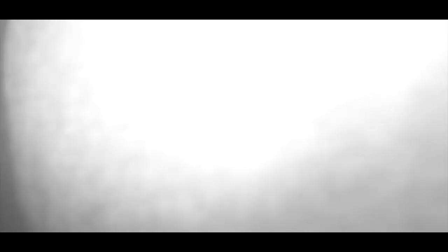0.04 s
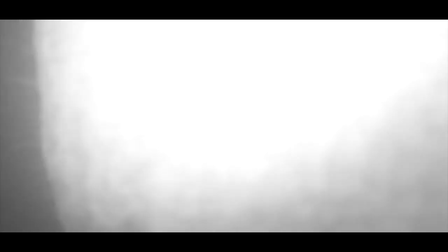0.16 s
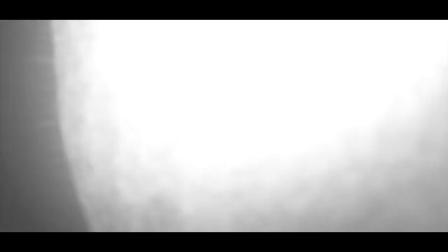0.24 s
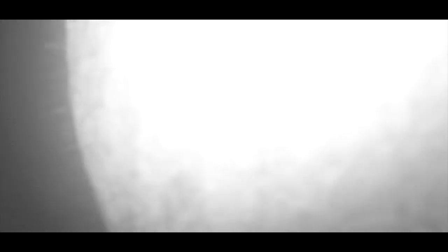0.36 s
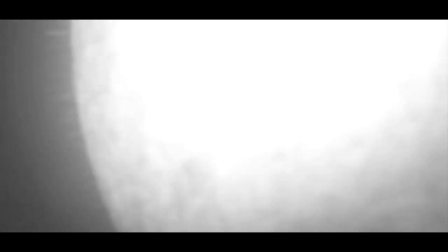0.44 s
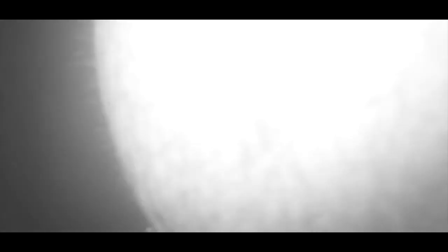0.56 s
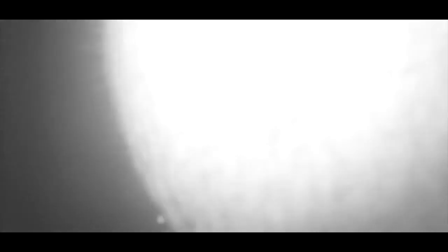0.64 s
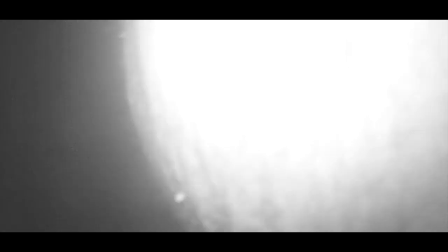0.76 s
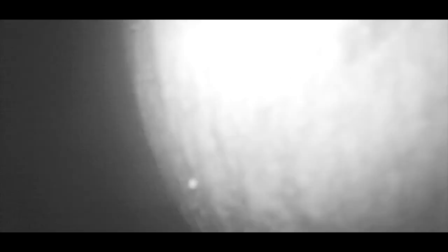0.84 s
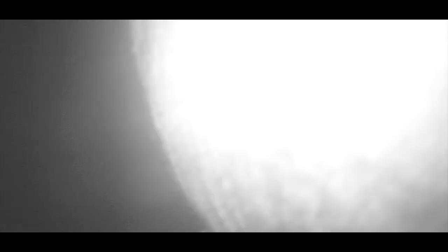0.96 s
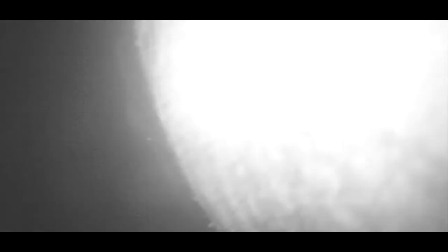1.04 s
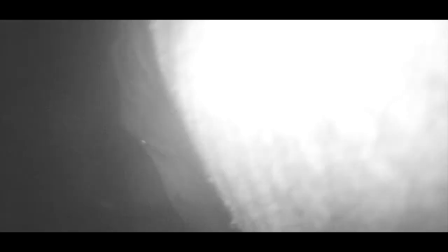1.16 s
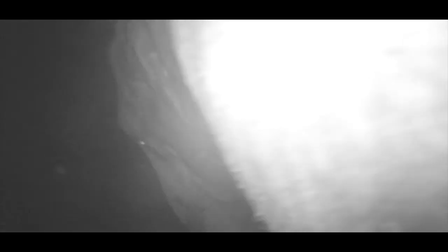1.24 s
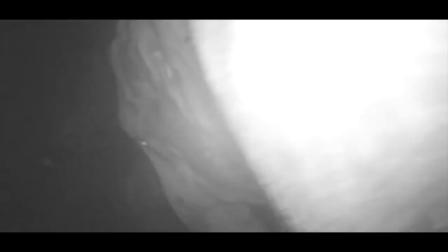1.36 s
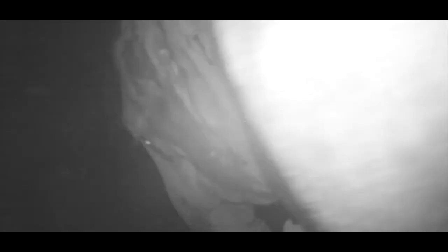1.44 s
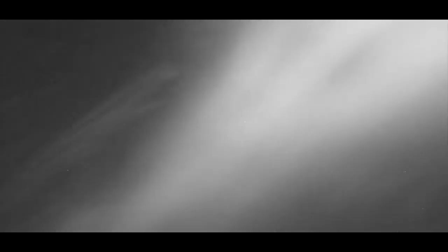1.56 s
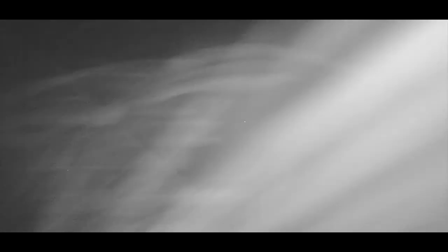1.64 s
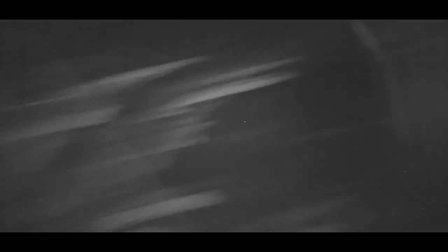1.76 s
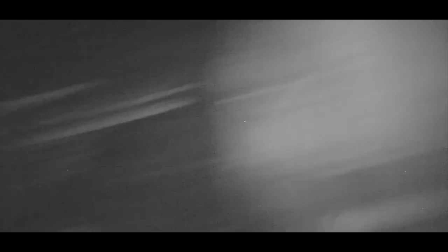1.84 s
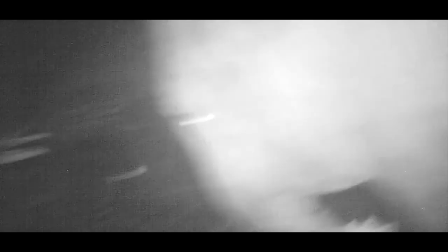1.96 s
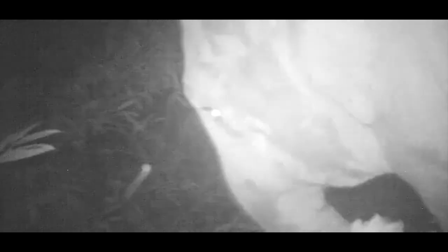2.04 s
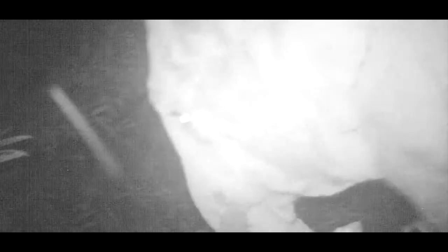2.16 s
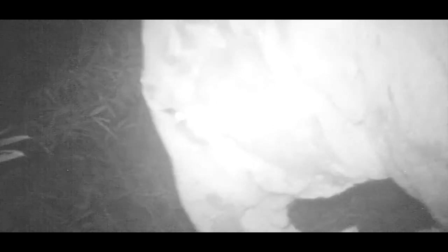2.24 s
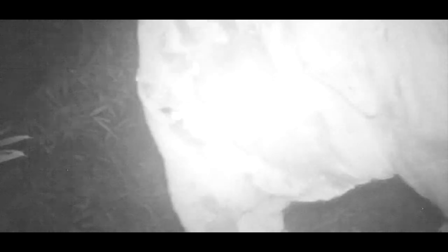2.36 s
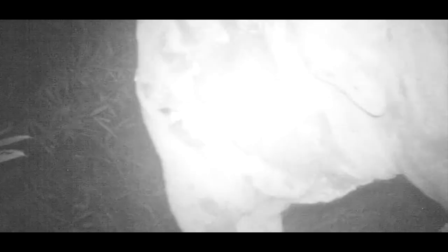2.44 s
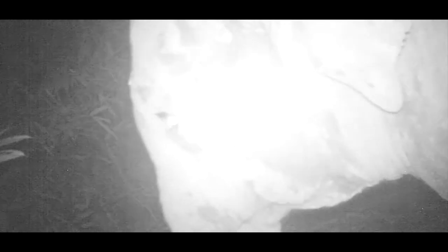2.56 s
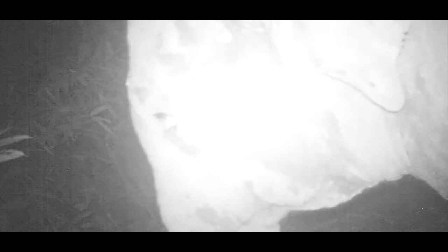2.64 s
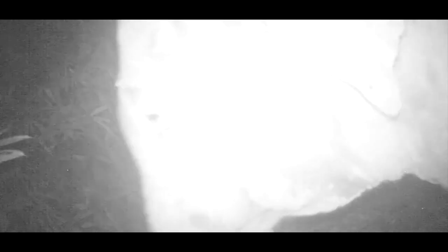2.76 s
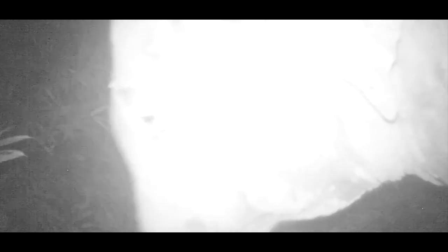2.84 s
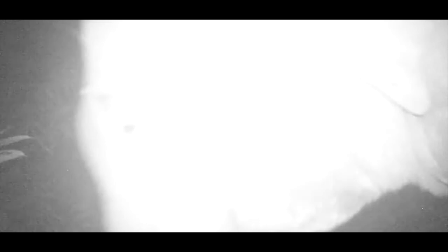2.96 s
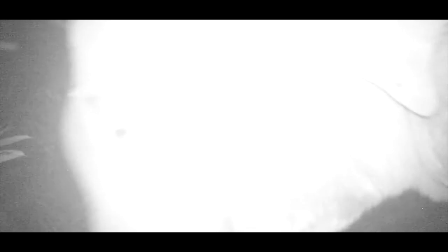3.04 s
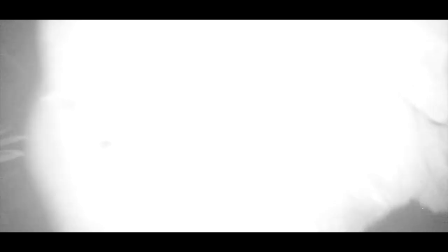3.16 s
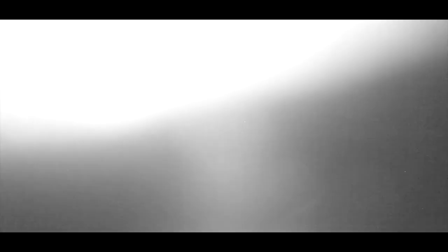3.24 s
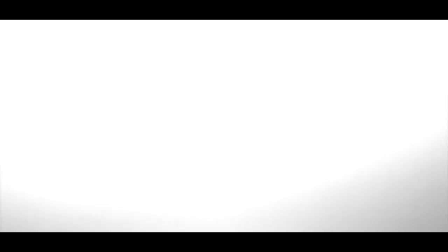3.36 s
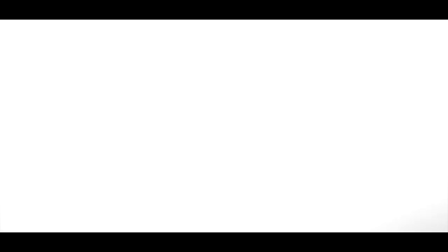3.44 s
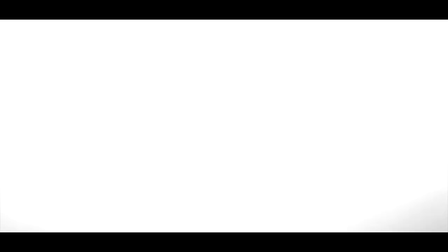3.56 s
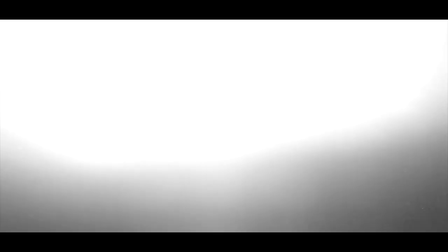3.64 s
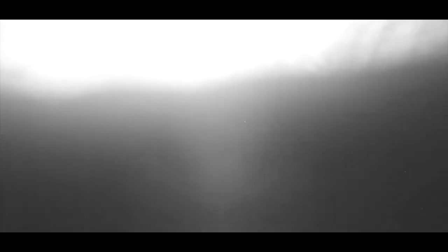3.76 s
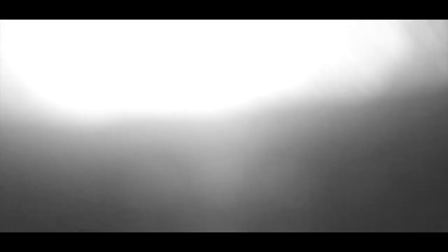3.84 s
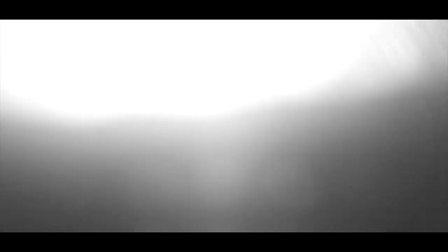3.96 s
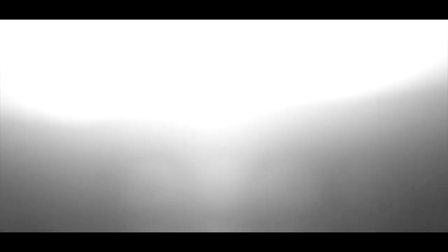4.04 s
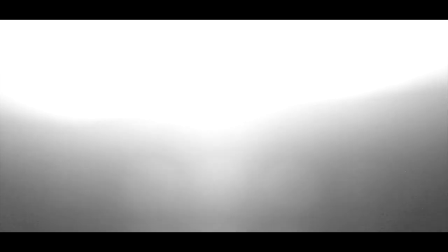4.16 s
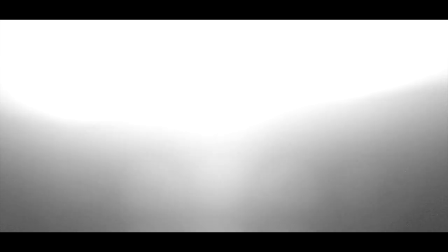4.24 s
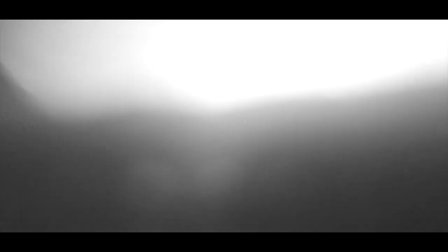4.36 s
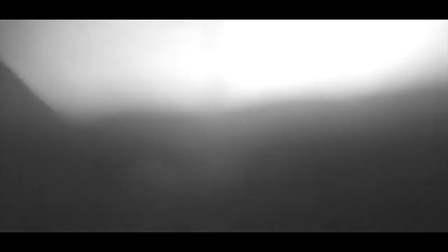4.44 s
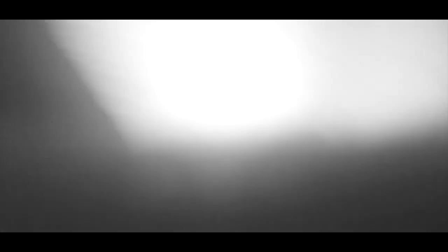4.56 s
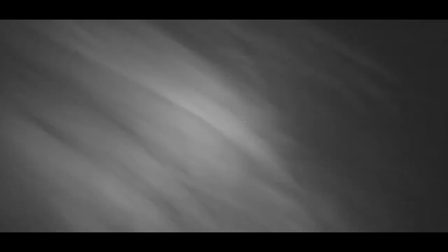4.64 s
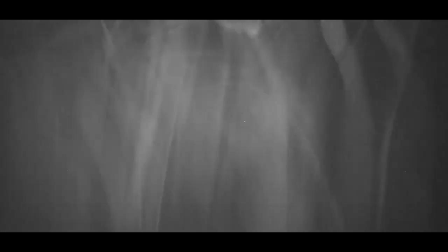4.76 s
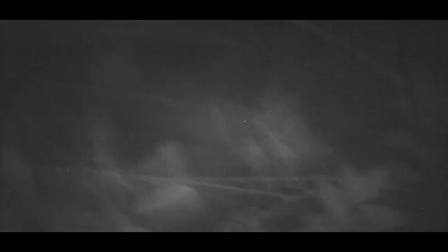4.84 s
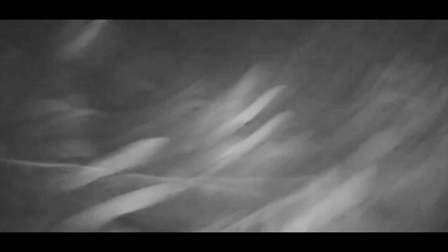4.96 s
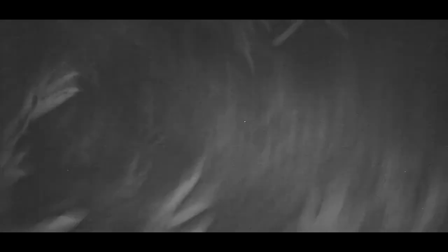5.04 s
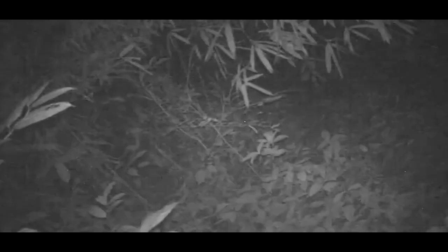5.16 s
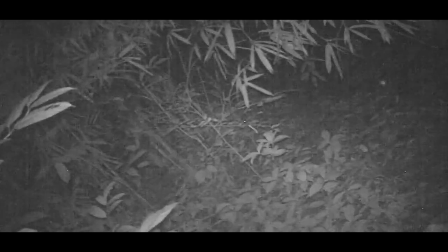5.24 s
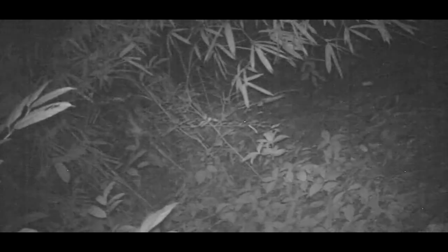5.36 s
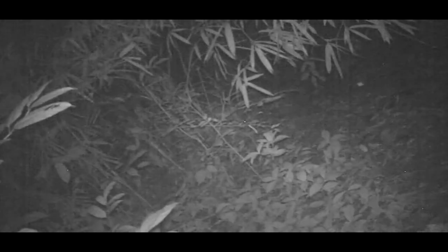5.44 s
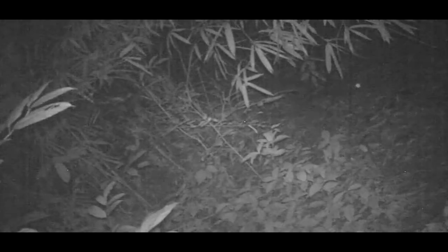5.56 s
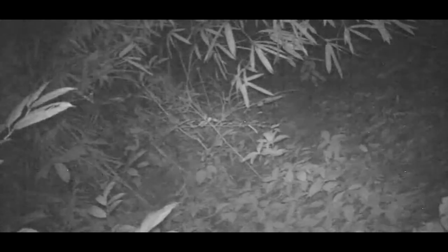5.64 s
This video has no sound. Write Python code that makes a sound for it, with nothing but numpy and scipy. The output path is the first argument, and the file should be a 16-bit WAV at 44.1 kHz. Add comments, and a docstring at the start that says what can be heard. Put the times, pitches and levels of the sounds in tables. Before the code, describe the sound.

An elephant rubs and knocks against a small plastic camera, with close scrapes and loud hollow thumps over night crickets and soft leaf rustle.

```python
"""Elephant against a camera

In a night forest, an elephant's skin drags over a small plastic camera, knocks its hollow case and
shoves it on its squeaking strap. Crickets chirp and leaves hiss behind. The cheap recorder overloads,
keeps little above 5 kHz, and its level is turned down for about a second in the middle."""
import sys
import numpy as np
from scipy import signal
from scipy.fft import rfft, irfft, next_fast_len
from scipy.io import wavfile
from scipy.ndimage import uniform_filter1d, map_coordinates

SR = 44100
rng = np.random.default_rng(int(sys.argv[2]) if len(sys.argv) > 2 else 0)


def wrap_up_sound(samples):
    """Save the sound to the file named by the first command line argument, as 16-bit audio."""
    columns = np.atleast_2d(samples).T
    # keep every value between -1 and 1, then stretch to whole-number steps
    tamed = np.clip(columns, -1, 1)
    steps = np.round(tamed * 32767).astype(np.int16)
    wavfile.write(sys.argv[1], SR, steps)


N = 251370

# Stereo image of the noises. Each row: frequency in Hz, left-right likeness (1 is mono).
STEREO_LIKENESS = [(150, 1), (350, .996), (700, .988), (1300, .96), (2300, .8), (4500, .7)]
# Skin stroking the case. Each row: start and release in seconds, then hiss, rasp and drag in dB.
SKIN_STROKES = [(0, 0.05, -22, -32.5, -40), (0.121, 0.195, -30.5, -53.5, -43),
                (0.269, 0.343, -32, -37, -33.5), (.37, 0.481, -22, -31, -31.5),
                (0.496, 0.629, -23, -20.5, -27), (0.652, .71, -25.5, -26.5, -37.5),
                (.735, 0.791, -26.5, -27, -36.5), (0.814, 0.971, -37, -43, -41.5),
                (1.69, 1.724, -29.5, -32.5, -33.5), (1.99, 2.12, -37.5, -45.5, -51),
                (2.14, 2.273, -39, -41, -44), (3.31, 3.415, -42, -43, -36), (4.497, 4.71, -41, -44, -47),
                (4.72, 4.778, -24, -34, -32), (4.784, 4.834, -17, -28, -26.5),
                (4.87, 4.964, -37.5, -45.5, -47), (4.985, 5.036, -36.5, -34, -32),
                (5.29, 5.362, -46, -52, -69)]
# Tone colours of the noise layers. Each row: frequency in Hz, relative level in dB.
WRINKLE_HISS_EQ = [(1500, -41.5), (2300, -10), (2900, -5), (3500, 1.5), (4200, -6), (4800, -9), (6000, -36)]
BRISTLE_RASP_EQ = [(700, -32.5), (1200, -8), (1600, -4), (2300, -2.5), (2900, -5.5), (4000, -39)]
FOLD_DRAG_EQ = [(70, -32), (130, -3), (450, -6.5), (1000, -2.5), (1500, -16), (2500, -42.5)]
SWAY_EQ = [(8, -16.5), (18, 1.5), (35, -2), (70, -7), (140, -15.5), (300, -40)]
LEAF_EQ = [(47, -36.5), (80, -6.5), (353, -14), (434, -12.5), (967, -12.5), (1850, -11.5), (2430, -5.5),
           (2650, -7.5), (3360, -1), (4730, -8.5), (6150, -40), (10400, -120)]
KNOCK_CRACKLE_EQ = [(760, -32.5), (1300, -10.5), (1680, -6), (2230, -3.5), (2820, -3), (4090, -2),
                    (4730, -15), (6150, -39), (10400, -120)]
KNOCK_BODY_EQ = [(90, -23.5), (150, 1.5), (440, -1.5), (800, -2.5), (1400, -4.5), (2200, -13.5),
                 (3500, -40)]
BRUSH_EQ = [(2200, -39.5), (2800, -7.5), (3300, 0), (3900, -3.5), (4600, -11.5), (5500, -40)]
# Fader moves for the camera's sway and for the leaves. Each row: time in seconds, level in dB.
SWAY_FADER = [(0, -38.5), (.3, -31), (.46, -42), (.6, -31.5), (.92, -35), (1.05, -57), (1.37, -54),
              (1.42, -32), (1.58, -40.5), (1.74, -26), (1.9, -38.5), (2.25, -41.5), (2.4, -57.5),
              (2.75, -56.5), (2.8, -45.5), (3.25, -51.5), (3.38, -25), (3.66, -55.5), (4.42, -58.5),
              (4.5, -36), (4.8, -28.5), (5.2, -33), (5.33, -57), (5.7, -61)]
LEAF_FADER = [(.1, -40.5), (.97, -37.5), (1.1, -41), (1.4, -43), (1.85, -41.5), (2.3, -45), (2.45, -47.5),
              (2.7, -44.5), (2.95, -43), (3.5, -47), (3.8, -43.5), (4.05, -48.5), (4.2, -46), (4.45, -44.5),
              (5.1, -44), (5.7, -46)]
# The far chorus. Each row: pitch in Hz, level in dB.
FAR_CRICKETS = [(3300, -55.5), (4400, -62.5)]
# Bouts of two near crickets. Each row: start, end and chirp spacing in seconds, pitch in Hz,
# level in dB, half-length of a chirp in seconds.
CRICKET_BOUTS = [(.102, 5.1, .1245, 3300, -46, .016), (5.207, 5.6, .1245, 3300, -39, .016),
                 (3.52, 3.9, .0503, 2500, -51, .01), (3.925, 4.45, .0503, 2500, -45.5, .012),
                 (5.26, 5.6, .0503, 2500, -51, .01)]
# Shoves and sharp jabs at the camera. Each row: start in seconds, level in dB, direction, pitch in Hz.
CAMERA_SHOVES = [(0.016, -21.5, -1, 45.5), (.188, -21, -1, 45), (0.292, -9.5, 1, 39.7),
                 (.568, -13, -1, 34.9), (.593, 0, 1, 43.8), (1.439, -16, -1, 39.7), (1.483, -19, 1, 39.4),
                 (1.627, -8, -1, 41.4), (1.656, -7, -1, 30), (1.673, 1.5, 1, 85), (1.684, -2.5, 1, 28),
                 (1.753, -17.5, -1, 38), (1.799, -23, -1, 49.7), (1.943, -14.5, -1, 49.4),
                 (1.998, -19, -1, 45.6), (2.068, -26, -1, 40), (2.13, -23, 1, 40.3),
                 (2.207, -18.5, -1, 91.4), (3.284, -7, 1, 70), (3.313, -6, 1, 23.8), (3.429, -8, -1, 94.5),
                 (4.537, -7.5, 1, 60), (4.814, -1.3, -1, 40.3), (4.825, 0.5, 1, 31.4),
                 (4.935, -24, -1, 40.3), (4.968, 0.5, 1, 69), (4.984, -6.5, 1, 22), (5.02, -20, -1, 50.6),
                 (5.071, -13, -1, 39.3), (5.131, -17.5, -1, 40.4)]
CAMERA_JABS = [(.246, -10.5, 1, 1360), (0.2906, -1.3, -1, 200), (.852, 6, -1, 380), (.924, -3.5, 1, 180),
               (1.406, -13, 1, 297), (1.409, -7.5, -1, 62), (1.922, -0.5, -1, 250)]
# Short ringing pops. Each row: start in seconds, level in dB, pitch in Hz, seconds to fade 60 dB.
RINGING_POPS = [(.045, -24, 473, 0.065), (.136, -6, 800, 0.012), (.3525, -2.5, 3746, 0.032),
                (.603, -4.5, 1660, 0.017), (.859, -19, 451, 0.14), (3.451, -33, 55.2, 0.54),
                (4.543, -6, 1494, 0.0037)]
# Knocks and jerks of skin. Each row: start in seconds, crackle and body in dB, hold in seconds.
CASE_KNOCKS = [(0.187, -31, -50, 0.0044), (0.293, -17.5, -15.5, 0.019), (0.308, -18, -22, 0.0098),
               (0.322, -39, -25.5, 0.0089), (0.354, -2.5, -21.5, 0.0042), (0.38, -20, -36, 0.013),
               (0.498, -16.5, -34, 0.012), (0.525, -16, -27, 0.027), (0.558, -26, -23.5, 0.015),
               (0.574, -17, -31, 0.0021), (0.601, -15, -25, 0.0075), (0.66, -20.5, -40, 0.0079),
               (0.696, -19, -48, 0.0094), (0.853, -16.5, -18.5, 0.0061), (0.858, -30, -20, 0.0065),
               (0.922, -24, -17.5, 0.0056), (0.933, -27, -25, 0.008), (1.632, -18, -17, 0.0058),
               (1.644, -19, -16.5, 0.0059), (1.657, -18, -18, 0.005), (1.671, 2.5, 1.5, 0.018),
               (1.697, -21, -18.5, 0.0097), (1.785, -51.5, -35.5, 0.011), (1.921, -31, -17.5, 0.013),
               (1.93, -27, -25.5, 0.013), (1.951, -40, -27.5, 0.021), (2.211, -15, -18.5, 0.011),
               (2.22, -18, -22.5, 0.0083), (2.24, -35, -26.5, 0.0067), (2.525, -45, -53.5, 0.0058),
               (2.807, -32, -42.5, 0.0046), (2.869, -27.5, -42, 0.0073), (2.908, -39, -42.5, 0.019),
               (3.18, -30.5, -49.5, 0.0027), (3.286, -21, -19, 0.018), (3.308, -12.5, -13, 0.011),
               (3.315, -15, -19.5, 0.026), (3.431, -11.5, -11.5, 0.0043), (3.45, -28, -30, 0.014),
               (3.931, -30.5, -47.5, 0.0018), (4.05, -47, -48.5, 0.002), (4.361, -32.5, -48, 0.0016),
               (4.518, -15.5, -41, 0.016), (4.528, -13.5, -25, 0.035), (4.551, -23.5, -24.5, 0.026),
               (4.658, -32.5, -46.5, 0.0077), (4.715, -33, -32, 0.018), (4.774, -25, -25.5, 0.0092),
               (4.808, -8, -15.5, 0.031), (4.843, -10.5, -12.5, 0.0034), (4.857, -19.5, -31, 0.0061),
               (4.97, 5, -2, 0.005), (5.026, -21, -18, 0.0031), (5.045, -27.5, -25, 0.002),
               (5.07, -30, -28, 0.011), (5.087, -34, -46, 0.005), (5.132, -35, -40, 0.02),
               (5.207, -34.5, -49.5, 0.004), (5.242, -38, -62.5, 0.0041)]
# The hollow case's ring. Each row: pitch in Hz, relative level in dB, seconds to fade 60 dB.
CASE_MODES = [(438, -4.5, 0.056), (674.5, -8, 0.065), (1059, -2, 0.043), (1660, -8.5, 0.033),
              (1880, -8.5, 0.045)]
# Bristles passing the microphone. Each row: start and release in seconds, level in dB.
BRISTLE_BRUSHES = [(1.165, 1.28, -31.5), (1.5, 1.55, -36.5), (1.9, 1.97, -33.5), (4.92, 4.96, -34)]
# The path of the strap's squeak. Each row: time in seconds, pitch in Hz, level in dB.
STRAP_SQUEAK = [(3.335, 470, -31), (3.39, 520, -22.5), (3.402, 502, -31.5), (3.43, 530, -20)]
# The recorder's band edge and the faint leak above it. Each row: frequency in Hz, gain in dB.
RECORDER_EQ = [(4600, 1), (4850, -2), (4950, -10), (5450, -11), (5900, -47.5), (6600, -43.5), (7600, -47),
               (8800, -48), (9800, -63.5), (11200, -86), (11800, -56.5), (13000, -58), (15000, -84.5)]


def amp(db):
    """Turn dB into gain."""
    return 10 ** (np.asarray(db) / 20)


def unit_rms(x):
    """Scale to an rms of 1."""
    return x / np.sqrt(np.mean(x ** 2) + 1e-20)


def along(points, hz):
    """Read a curve of (Hz, value) points on a log frequency axis."""
    freqs, values = np.transpose(points)
    return np.interp(np.log(hz + 1), np.log(freqs + 1), values)


def curves(rows):
    """Draw a line, sample by sample, through each column after the time."""
    times, *columns = np.transpose(rows)
    return [np.interp(np.arange(N) / SR, times, column) for column in columns]


def wobble(rate):
    """A smooth random drift with `rate` points a second."""
    return map_coordinates(rng.standard_normal(int(N * rate / SR) + 4), [np.arange(N) * rate / SR])


def filtered(x, response):
    """Equalise x with a gain given as a function of Hz."""
    size = next_fast_len(N + SR // 2)
    return irfft(rfft(x, size) * response(np.fft.rfftfreq(size, 1 / SR)), size)[..., :N]


def low_pass(x, edge_hz):
    """A steep but smooth treble cut."""
    return filtered(x, lambda hz: 1 / (1 + (hz / edge_hz) ** 40))


def grit(eq, grain_rate, spread_db, patchy_db):
    """Stereo friction of rms 1: noise in uneven grains and shifting patches of pitch, narrow in the bass."""
    def mid_side_gains(hz):
        width = np.arccos(np.clip(along(STEREO_LIKENESS, hz), -1, 1)) / 2
        return amp(along(eq, hz)) * [np.cos(width), np.sin(width)]

    grains = rng.standard_normal((2, N)) * amp(spread_db * wobble(grain_rate))
    spectra = signal.stft(grains, nperseg=256)[2]
    patches = uniform_filter1d(rng.standard_normal(spectra.shape[1:]), size=4, axis=0)  # across pitch
    patches = unit_rms(uniform_filter1d(patches, size=8, axis=1))  # across time
    patchy = signal.istft(spectra * amp(patchy_db * patches), nperseg=256)[1][:, :N]
    mid, side = filtered(patchy, mid_side_gains)
    return unit_rms(np.array([mid + side, mid - side]))


def stroke_envelopes(rows, t60, attack_s=0.013):
    """One envelope for each level column: every stroke swells, holds and fades."""
    t, power = np.arange(0, N, 20) / SR, 0
    for start, release, *levels_db in rows:
        attack = np.clip(1 + (t - start) / attack_s, 0, 1)
        fade = amp(-60 * np.maximum(t - release, 0) / t60)
        power = power + (amp(levels_db)[:, None] * attack * fade) ** 2
    return curves(np.transpose([t, *np.sqrt(power)]))


def damped_swings(rows):
    """Decaying sines, one for each row of start in seconds, dB, direction, Hz and dB lost a second."""
    out, t = np.zeros(N + SR), np.arange(SR // 4) / SR
    for start, db, direction, hz, loss_db_per_s in rows:
        envelope = amp(db - loss_db_per_s * t)
        out[round(start * SR):][:len(t)] += np.sign(direction) * envelope * np.sin(2 * np.pi * hz * t)
    return out[:N]


def skin_rubbing():
    """Skin slides over plastic: fine wrinkles hiss, bristles rasp, coarse folds drag."""
    hiss, rasp, drag = stroke_envelopes(SKIN_STROKES, t60=0.15)
    return (hiss * grit(WRINKLE_HISS_EQ, grain_rate=270, spread_db=2.5, patchy_db=1.5)
            + rasp * grit(BRISTLE_RASP_EQ, grain_rate=250, spread_db=4.0, patchy_db=1.5)
            + drag * grit(FOLD_DRAG_EQ, grain_rate=200, spread_db=2.0, patchy_db=3.0))


def camera_sway():
    """The whole camera sways on its strap with a deep rumble."""
    return amp(*curves(SWAY_FADER)) * grit(SWAY_EQ, grain_rate=19, spread_db=4, patchy_db=0.6)


def leaves():
    """The undergrowth lays down a soft bed of rustle."""
    return amp(*curves(LEAF_FADER)) * grit(LEAF_EQ, grain_rate=200, spread_db=2.0, patchy_db=2.0)


def crickets(scatter_db=2.2, scatter_s=0.004):
    """Far crickets blur into wavering tones; two near ones chirp over them, each at its own pace."""
    t, out = np.arange(N) / SR, np.zeros((2, N + SR))
    mic_phase = np.array([[0.3], [-0.3]])  # left and right, in radians
    for hz, db in FAR_CRICKETS:
        shimmer = amp(db + 2.7 * wobble(27))
        out[:, :N] += shimmer * np.sin(2 * np.pi * hz * t + 0.63 * wobble(30) + mic_phase)
    chirp_t = np.arange(-SR // 20, SR // 20) / SR
    for start, end, spacing, hz, db, half_length in CRICKET_BOUTS:
        chirp = np.exp(-(chirp_t / half_length) ** 2) * np.sin(2 * np.pi * hz * chirp_t + mic_phase)
        chance = rng.standard_normal((int(N / SR / spacing), 2))
        for beat, (late, loud) in zip(np.arange(start, end, spacing), chance):
            at = round((beat + scatter_s * late) * SR) - SR // 20
            out[:, at:][:, :len(chirp_t)] += amp(db + scatter_db * loud) * chirp
    return out[:, :N]


def shoves(loss_db_per_swing=16.5):
    """A shove rocks the camera for a swing or two: a low thud."""
    return damped_swings((start, db, way, hz, loss_db_per_swing * hz) for start, db, way, hz in CAMERA_SHOVES)


def ringing_pops():
    """Short pops ring briefly, each on one note."""
    return damped_swings((start, db, 1, hz, 60 / t60) for start, db, hz, t60 in RINGING_POPS)


def knocks(attack_s=0.001, crackle_t60=0.031, body_t60=0.041):
    """Each knock rings the hollow case and throws a burst of grit that holds, then dies."""
    crackle_power, body_power, ring = np.zeros((3, N + SR))
    t = np.arange(SR // 5) / SR
    attack = np.minimum(t / attack_s, 1)
    for start, crackle_db, body_db, hold in CASE_KNOCKS:
        span = slice(round(start * SR), round(start * SR) + len(t))
        since_release = np.maximum(t - hold, 0)
        crackle_power[span] += (attack * amp(crackle_db - 60 * since_release / crackle_t60)) ** 2
        body_power[span] += (attack * amp(body_db - 60 * since_release / body_t60)) ** 2
        for hz, mode_db, t60 in CASE_MODES:
            ring_db = body_db - 3.0 + mode_db + 1.1 * rng.standard_normal()
            ring[span] += amp(ring_db - 60 * t / t60) * np.sin(2 * np.pi * hz * t)
    crackle = grit(KNOCK_CRACKLE_EQ, grain_rate=500, spread_db=2.5, patchy_db=3.5)
    body = grit(KNOCK_BODY_EQ, grain_rate=300, spread_db=0.46, patchy_db=1.5)
    return np.sqrt(crackle_power[:N]) * crackle + np.sqrt(body_power[:N]) * body + ring[:N]


def jabs(loss_db_per_swing=35):
    """A jab is damped so hard that it lands as a single push."""
    return damped_swings((start, db, way, hz, loss_db_per_swing * hz) for start, db, way, hz in CAMERA_JABS)


def bristle_brushes():
    """Bristles graze the microphone with a narrow, grainy swish."""
    envelope, = stroke_envelopes(BRISTLE_BRUSHES, t60=0.063)
    return envelope * grit(BRUSH_EQ, grain_rate=300, spread_db=2.5, patchy_db=1.5)


def strap_squeak():
    """The strap squeaks once: a short tone, unsteady in pitch and level."""
    hz, db = curves(STRAP_SQUEAK)
    t = np.arange(N) / SR
    start, end = STRAP_SQUEAK[0][0], STRAP_SQUEAK[-1][0]
    gate = uniform_filter1d(1. * ((t > start) & (t < end)), size=300)
    level = amp(db + 2.1 * wobble(80))
    pitch = hz * (1 + 0.018 * wobble(110))
    return gate * level * np.sin(2 * np.pi * np.cumsum(pitch) / SR)


def level_dip(t, start_s=2.768, end_s=4.022, depth_db=-15):
    """The recorder's level is turned down, then back up."""
    return uniform_filter1d(np.where((t > start_s) & (t < end_s), amp(depth_db), 1.), size=40)


def click(t, start_s=3.2844, db=-22, t60=0.0034):
    """One bare click: a sudden step that dies at once."""
    return (t > start_s) * amp(db - 60 * np.abs(t - start_s) / t60)


def scene():
    """The mix at the microphones: the elephant up close, the forest behind."""
    return (skin_rubbing() + camera_sway() + leaves() + crickets() + shoves() + ringing_pops()
            + knocks() + jabs() + bristle_brushes() + strap_squeak())


def record(dry, ceiling=1.02, sampling_hz=11025, knee=12):
    """The cheap recorder clips its input, dulls and faintly mirrors the treble, and saturates its output."""
    t = np.arange(N) / SR
    clipped = low_pass(np.clip(dry, -ceiling, ceiling), sampling_hz / 2)
    mirror = 2 * clipped * np.cos(2 * np.pi * sampling_hz * t)  # images from the low sampling rate
    dulled = filtered(clipped + mirror, lambda hz: amp(along(RECORDER_EQ, hz)))
    hiss = amp(-82) * filtered(rng.standard_normal((2, N)), lambda hz: hz < sampling_hz)
    whine = amp(-92) * np.sin(2 * np.pi * sampling_hz * t)
    mix = amp(0.33) * level_dip(t) * dulled + click(t) + hiss + whine
    saturated = mix / (1 + np.abs(mix) ** knee) ** (1 / knee)  # a higher knee bites more abruptly
    return low_pass(saturated, edge_hz=17500)


dry = scene()
out = record(dry)
wrap_up_sound(out)
```